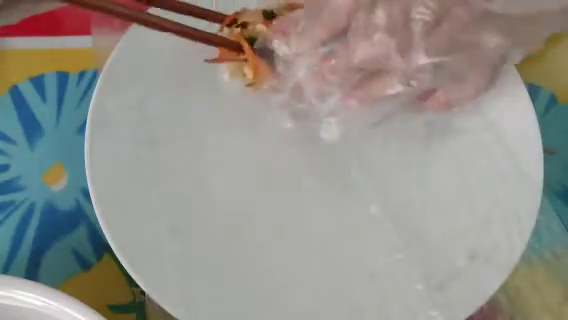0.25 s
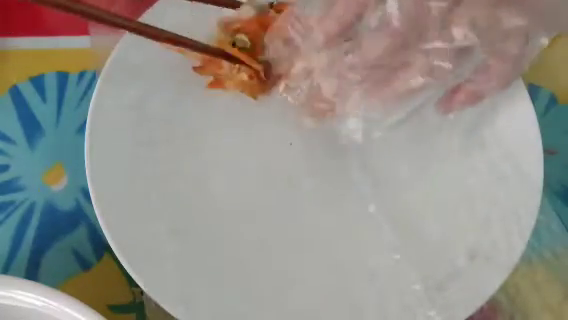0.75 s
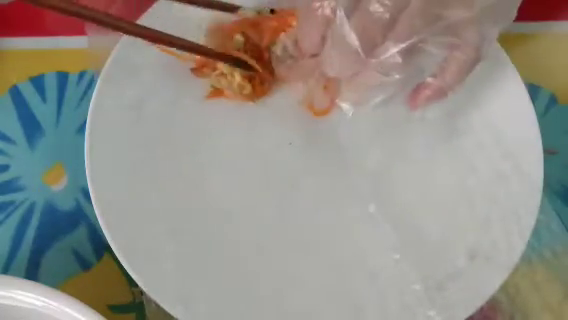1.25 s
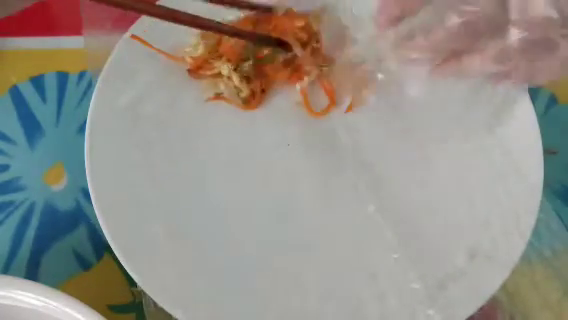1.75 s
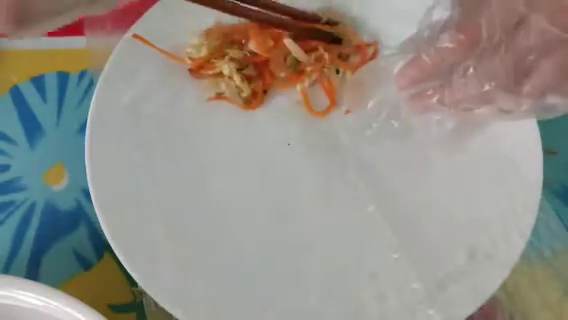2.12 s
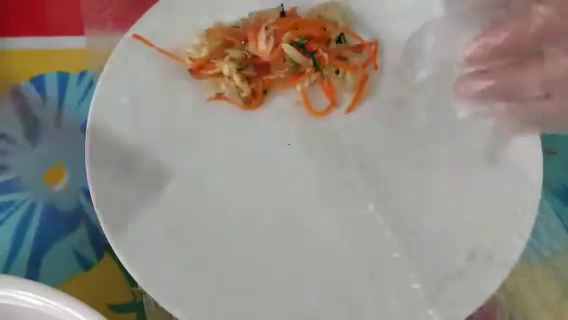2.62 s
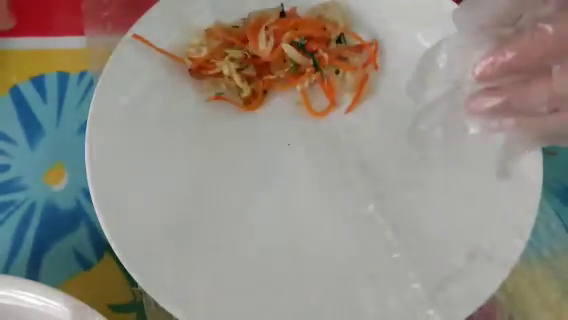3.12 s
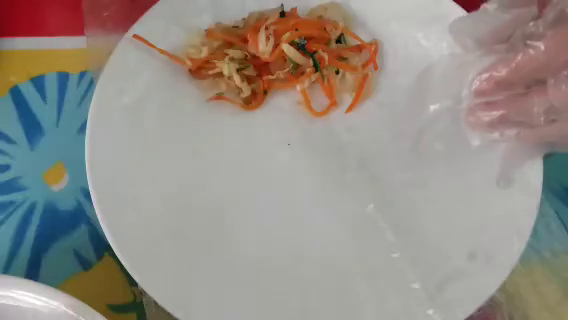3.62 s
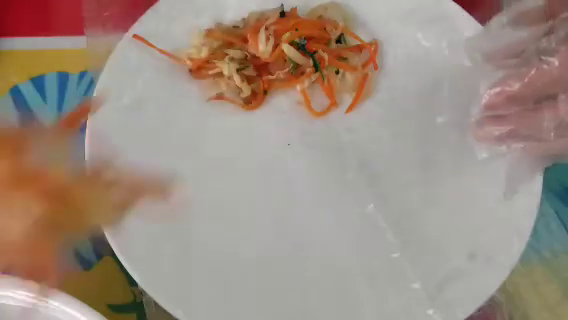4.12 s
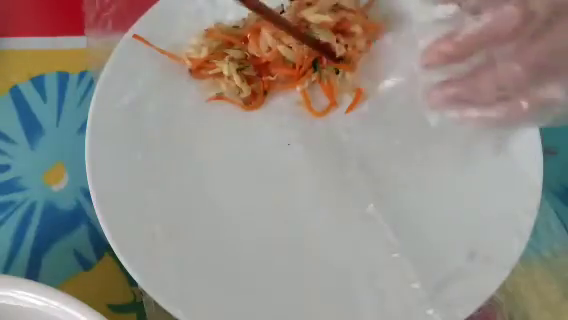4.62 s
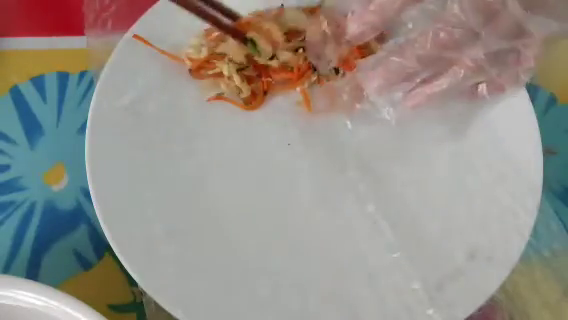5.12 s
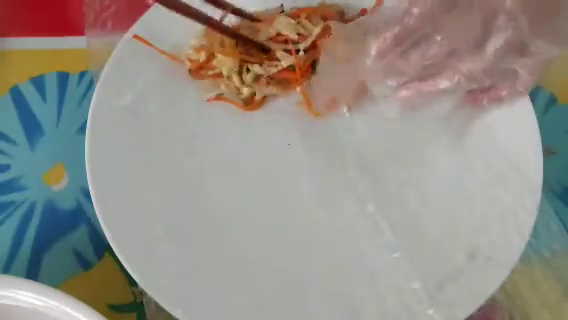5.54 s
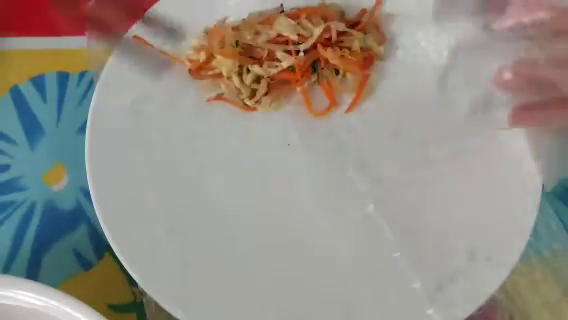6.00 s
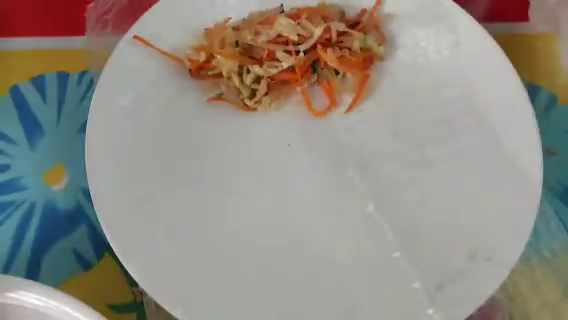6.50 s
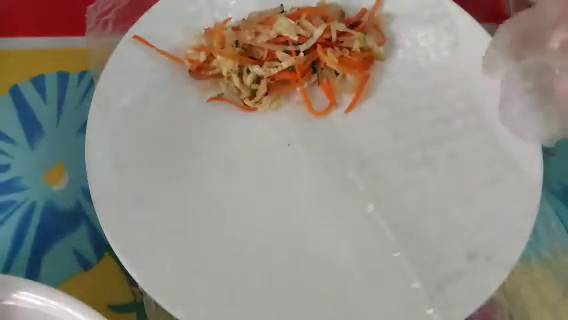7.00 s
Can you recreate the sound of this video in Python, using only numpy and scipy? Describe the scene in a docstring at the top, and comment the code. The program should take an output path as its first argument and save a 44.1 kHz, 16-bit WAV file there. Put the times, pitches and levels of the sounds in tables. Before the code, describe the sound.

Very close, a thin plastic glove crackles in busy, uneven strokes, with duller rubbing on moist shredded food and single sharp ticks from stiff creases. Chopsticks scrape faintly through the food. The rustling thins to near quiet around four seconds, then returns stronger. Near the end sticks clink loudly on a china bowl in two pairs. A low motor hum wavers behind in a small, lightly echoing kitchen.

```python
"""A hand in a thin plastic glove spreads shredded vegetables on a wrapper, close by, in a small kitchen.
The film buckles in avalanches of tiny ringing snaps and rubs on the food; stiffer creases tick singly.
Chopsticks drag through the food by many small slips, and knock a china bowl: one faint knock midway,
two double clinks near the end, each a noise crack and clatter with decaying modes of bowl and sticks.
Behind, a motor hums in wavering low tones over rumbling noise; diffuse echoes follow hands and bowl."""
import sys
import numpy as np
from scipy import signal
from scipy.fft import rfft, irfft, next_fast_len
from scipy.io import wavfile
from scipy.ndimage import uniform_filter1d

SR = 44100
rng = np.random.default_rng(int(sys.argv[2]) if len(sys.argv) > 2 else 0)


def wav_record(signal):
    """Record a signal, one row per channel, as 16-bit PCM in the file named by sys.argv[1]."""
    frames = np.transpose(np.atleast_2d(signal))
    bounded = np.clip(frames, -1, 1)
    # unit amplitude maps onto the largest positive 16-bit level
    quanta = np.round(bounded * 32767).astype(np.int16)
    wavfile.write(sys.argv[1], SR, quanta)


N = 320120
T = np.arange(N) / SR

# path of the hand, further left when it lifts off the food: (time [s], left over right [dB])
HAND_PAN = [(0.0, 0.5), (2.6, 0.7), (3.03, 7), (3.6, 5), (4.5, 0), (5.95, 0), (6.4, 5), (7.1, 3.5),
            (7.26, -1)]
# every movement slackens a little as it goes on and dies away once it stops
SAG_DB_PER_S, RELEASE_DB_PER_S = 5.0, 95.0
# the glove never lies quite still: floor of the crackle, and lone ticks set above the crackle on average
RESTING_DB, TICKS_PER_S, TICK_ABOVE_DB = -77.0, 12.0, 7.5
ROOM_T60_S = 0.47
CUTOFF_HZ = 16100


def from_db(db):
    """Amplitude gain is ten to the power of decibels over twenty."""
    return 10 ** (np.asarray(db) / 20)


def rms_one(x):
    """Normalisation to unit mean power."""
    return x / np.sqrt(np.mean(x ** 2) + 1e-20)


def in_time(rows):
    """Linear interpolation of a curve at every sample."""
    return np.interp(T, *np.transpose(rows))


def panned(db):
    """Level difference between the ears at constant total power; positive is left."""
    gains = from_db(np.array([[.5], [-.5]]) * db)
    return gains / np.sqrt(np.mean(gains ** 2, axis=0))


def drift(rate):
    """Band-limited random fluctuation of spread 1 that changes about rate times a second."""
    walk = uniform_filter1d(rng.standard_normal(8192), size=3)
    return np.interp(T * rate * 2, np.arange(len(walk)), rms_one(walk))


def coloured(x, spectrum):
    """Minimum-phase filtering: folding the cepstrum makes the response to a spectrum causal."""
    length = x.shape[-1]
    size = 2 * next_fast_len(length // 2 + SR // 10)
    hz, db = np.transpose(spectrum)
    bins_hz = np.arange(size // 2 + 1) * SR / size
    gain = from_db(np.interp(np.log(bins_hz + 1), np.log(hz), db))
    cepstrum = irfft(np.log(gain))
    cepstrum[1:size // 2] *= 2
    cepstrum[size // 2 + 1:] = 0
    response = np.exp(rfft(cepstrum))
    return irfft(rfft(x, size) * response)[..., :length]


def burst(t60, size):
    """Exponentially decaying noise of unit energy, independent at the two ears."""
    dying = rng.standard_normal((2, size)) * from_db(-60 * np.arange(size) / SR / t60)
    return dying / np.sqrt(np.sum(dying ** 2, axis=1, keepdims=True))


def add(out, s, sound):
    """Superposition of a short sound at time s."""
    start = round(s * SR)
    out[:, start:start + sound.shape[1]] += sound[:, :N - start]


def movements(rows):
    """Powers of movements sum; each rises, sags, then dies away. Gives the level in dB."""
    power = 1e-12
    for start, rise_s, length_s, db in rows:
        age = np.maximum(T - start, 0)
        sag_db = SAG_DB_PER_S * np.maximum(age - rise_s, 0)
        release_db = RELEASE_DB_PER_S * np.maximum(age - length_s, 0)
        rise = np.minimum(age / max(rise_s, .005), 1)
        power = power + (rise * from_db(db - sag_db - release_db)) ** 2
    return 10 * np.log10(power)


def film(per_s, spread_db, clump_db, t60, likeness, low_hz, high_hz, ring_db, count=48):
    """Avalanche process: buckles or slips set off others, each with its own pitch and brief ring."""
    # activity jumps at each upset, then dies away
    upsets = (rng.random(N) < 55 / SR) * rng.exponential(1, N)
    avalanche = signal.lfilter([1], [1, -np.exp(-1 / (.008 * SR))], upsets)
    surge = from_db(clump_db * np.minimum(avalanche, 2))
    born = rng.random(N) < per_s * surge / SR
    size = from_db(spread_db * np.minimum(rng.exponential(1, N), 4.5))
    clicks = born * np.sqrt(surge) * size * rng.choice([-1, 1], N)
    # slow changes of level are evened out
    power = uniform_filter1d(uniform_filter1d(clicks ** 2, size=2600), size=1300)
    clicks = clicks / np.sqrt(np.abs(power) + 0.0013)

    # a stock of rings, partly shared between the ears
    shared = np.clip(likeness, 0, 1)
    rings = []
    for hz in np.geomspace(low_hz, min(high_hz, .4 * SR), count):
        tick = np.sqrt(1 - shared) * burst(t60, size=384) + np.sqrt(shared) * burst(t60, size=384)[:1]
        ring = tick + from_db(ring_db) * signal.lfilter(*signal.iirpeak(hz, 3, fs=SR), tick)
        rings.append(rms_one(ring))

    # one ring, drawn at random, at every click
    at = np.flatnonzero(born)
    grains = np.array(rings)[rng.integers(0, count, len(at))] * clicks[at, None, None]
    places = (at[:, None] + np.arange(grains.shape[2])).ravel()
    return np.array([np.bincount(places, side.ravel(), N)[:N] for side in grains.swapaxes(0, 1)])


def glove(crackle_db, rub_db, busy=.35, flutter_db=1.1):
    """Buckling of the free film crackles brightly; friction under the fingers rubs more dully."""
    # spectra: (frequency [Hz], relative density [dB per Hz])
    crackle_colour = [(300, -23), (1000, -6), (2500, -2), (4500, -1), (6800, -1), (8100, 3), (9300, -1.5),
                      (11000, 3), (12300, 4), (14000, 2), (15800, 0), (17000, -60)]
    rub_colour = [(150, -5), (450, 6), (750, 3.5), (1050, 0), (1450, 0), (2000, 1.5), (2500, 3),
                  (3500, -1.5), (6000, -7), (16000, -55)]
    # louder movement also makes the events denser
    effort = from_db(busy * (crackle_db + 42))
    crackle = film(1800 * effort, spread_db=3.0, clump_db=3.0, t60=0.0097, likeness=0.021,
                   low_hz=2630, high_hz=16300, ring_db=0.5)
    rub = film(1100 * effort, spread_db=3.0, clump_db=4.0, t60=0.013, likeness=0.28,
               low_hz=780, high_hz=3550, ring_db=-3.0)
    crackle = rms_one(coloured(crackle, crackle_colour)) * from_db(crackle_db - 0.02)
    rub = rms_one(coloured(rub, rub_colour)) * from_db(rub_db + 1.0)
    both = crackle * panned(in_time(HAND_PAN)) + rub * panned(1.0)
    # the film sticks and slips, so both sounds flutter together
    return both * from_db(flutter_db * drift(45))


def snaps(crackle_db, spread_db=5.0, ring_db=0.5, low_hz=3000, high_hz=13000):
    """Snap-through instability: a stiff crease flips with a sharp pitched tick and a brief shiver."""
    # single creases: (time [s], relative level [dB], pitch [Hz], left over right [dB])
    creases = [(0.0258, -25.5, 12600, 1), (0.102, -22.5, 4500, 1), (0.2768, -22.5, 6000, 4),
               (0.3422, -19.5, 6000, 3), (0.4918, -19, 9000, 6), (0.6983, -25, 8996, 4),
               (0.774, -18, 7000, 6), (1.3223, -26, 12000, 1.5), (1.6501, -45, 9020, -5),
               (1.7704, -25.5, 3996, 2), (1.8204, -27, 11960, 4), (2.2528, -29.5, 7010, 15),
               (2.2897, -21.5, 6000, 9), (2.4867, -23, 8995, 2), (3.0541, -25, 12990, 17),
               (3.09, -20.5, 13000, 14), (3.223, -21, 5010, 3), (3.263, -29, 6980, 10),
               (3.3922, -34, 9020, 11), (3.468, -32, 13010, 7.5), (3.5518, -31, 9020, 3),
               (3.5872, -34, 7010, 9), (3.6745, -33, 5010, 11), (4.0136, -37, 6000, 8),
               (4.0752, -31.5, 8990, -1), (4.528, -34, 7500, -1), (4.6813, -31, 8000, 11),
               (4.8214, -29.5, 8008, 5), (5.165, -26, 4000, 5), (6.3775, -26, 6000, 11),
               (6.4725, -21, 11520, 17), (6.698, -15.5, 12010, 7), (6.9362, -28, 8000, 10)]
    # spectrum: (frequency [Hz], gain [dB])
    snap_colour = [(300, -16), (1200, -1), (3000, 1), (8000, 7), (12000, 9.5), (16000, 4)]
    # smaller creases flip at random, with a level that follows the crackle
    at = np.flatnonzero(rng.random(N) < TICKS_PER_S / SR)
    tick_db = crackle_db[at] + TICK_ABOVE_DB + spread_db * rng.standard_normal(len(at))
    tick_hz = low_hz * (high_hz / low_hz) ** rng.random(len(at))
    small = np.transpose([T[at], tick_db, tick_hz, in_time(HAND_PAN)[at]])

    out = np.zeros((2, N))
    for s, db, hz, pan_db in [*creases, *small]:
        shiver = from_db(-7) * burst(t60=0.024, size=640)
        tick = burst(t60=.005, size=640) + shiver
        resonance = signal.iirpeak(min(hz, .4 * SR), 4, fs=SR)
        tick = tick + from_db(ring_db) * signal.lfilter(*resonance, tick)
        add(out, min(s + .0008, T[-1]), from_db(db + 1.0) * panned(pan_db) * tick)
    return coloured(out, snap_colour)


def chopsticks():
    """Stick-slip excitation: many small slips of the tips keep the sticks' bending note sounding."""
    # drags through the food: (start [s], rise [s], length [s], relative level [dB])
    drags = [(0.11, 0.04, 0.04, -47), (0.26, 0.059, 0.42, -47), (0.83, 0.036, 0.15, -55),
             (0.94, 0.11, 0.27, -44.5), (1.33, 0.13, 0.2, -45), (1.9, 0.089, 0.18, -50),
             (2.19, 0.019, 0.64, -60.5), (4.82, 0.096, 0.21, -49.5), (5.24, 0.11, 0.24, -47),
             (5.61, 0.05, 0.23, -54), (5.85, 0.031, 0.043, -43)]
    # spectrum: (frequency [Hz], relative density [dB per Hz])
    drag_colour = [(200, -28), (800, -43.5), (1050, -3.5), (1300, -5), (1520, -2.5), (1720, -9.5),
                   (2100, -8), (4000, -40), (16000, -63)]
    slips = film(500, spread_db=3.5, clump_db=3.0, t60=0.0052, likeness=0.62,
                 low_hz=1220, high_hz=1880, ring_db=7)
    return rms_one(coloured(slips, drag_colour)) * from_db(movements(drags) - 5.0) * panned(0.93)


def clinks(left_lead_rad=1.59, rise_s=0.0013, crack_db=12, clatter_db=21):
    """Modal excitation by impact: a crack and short clatter, while modes of bowl and sticks decay."""
    # knocks; the spot struck favours some modes:
    # (time [s], relative level [dB], then the extra gain [dB] at each of spot_hz)
    knocks = [(3.625, -47.5, -5, 6, -1, -11, -14, -18), (6.5574, -9.5, -12, 0.5, 0, -3, -4, 2),
              (6.6313, -12, -9.5, 7, 2, -0.5, -5, -0.5), (6.646, -29.5, -4, 11, 9, -14, 13, 5),
              (6.9455, -16.5, 5.5, 8, 1, -3, 6, -3), (6.9999, -12, 0, 3.5, -6, 1, 4, -3.5)]
    # where the extra gains apply: (frequency [Hz])
    spot_hz = [900, 1550, 2374, 3397, 4600, 6500]
    # modes of the china bowl: (frequency [Hz], relative level [dB], T60 [s], left over right [dB])
    bowl_modes = [(2369, -10.5, 0.18, 1.5), (3398, 3, 0.07, -0.5), (4592, -6.5, 0.074, 3.5),
                  (5956, -11.5, 0.09, 3), (6949, -14.5, 0.05, 11), (7472, -13.5, 0.062, 13),
                  (10850, -14.5, 0.06, 15)]
    # close modes of the sticks, a clack that dies at once: same columns
    # (frequency [Hz], relative level [dB], T60 [s], left over right [dB])
    wood_modes = [(1520, -2.5, .028, -1), (1690, -8, .024, 0), (1812, -16, .02, 0), (2082, -15, .02, 3),
                  (2480, -5.5, .022, 1), (3720, -15, .022, -2)]
    # clatter of stick on china: (frequency [Hz], relative density [dB per Hz])
    clatter_colour = [(120, -13), (280, -1), (500, -14.5), (780, 5.5), (1030, 2.5), (1220, -11), (1550, -8),
                      (2100, 3), (2900, -4.5), (3600, 2.5), (5200, -10), (7000, -6), (9500, -17.5),
                      (11200, -3), (16000, -16)]
    out, t = np.zeros((2, N)), T[:SR // 4]
    for s, db, *spot_db in knocks:
        for hz, mode_db, t60, pan_db in [*bowl_modes, *wood_modes]:
            gain_db = db + mode_db + np.interp(hz, spot_hz, spot_db)
            # the ring reaches the two ears out of step
            phase = 2 * np.pi * (hz * t + rng.random()) + left_lead_rad * np.array([[1], [0]])
            envelope = from_db(gain_db - 60 * t / t60) * (1 - np.exp(-t / rise_s))
            add(out, s, envelope * np.sin(phase) * panned(pan_db))
        crack = from_db(crack_db) * burst(t60=0.0035, size=4096)
        clatter = from_db(clatter_db) * coloured(burst(t60=0.087, size=4096), clatter_colour)
        impact = coloured(crack + clatter, list(zip(spot_hz, spot_db)))
        add(out, s, from_db(db) * impact * panned(2.5))
    return out


def kitchen(x):
    """Diffuse reverberation: hard walls return a decaying tail, its treble partly absorbed."""
    # the tail begins 5 ms late
    tail = np.pad(burst(ROOM_T60_S, size=24000), ((0, 0), (SR // 200, 0)))
    echo = signal.fftconvolve(x, tail, axes=1)[:, :N]
    return coloured(echo, [(300, 9.5), (1500, 0.5), (3400, 0.0), (7000, -2), (15000, -9)])


def air(spectrum):
    """Interaural coherence of steady noise: alike at both ears in the bass, wide in the treble."""
    # (frequency [Hz], side against mid [dB])
    air_width = [(60, -18.5), (130, -13.5), (280, -9.5), (600, -5.5), (1500, 4.5)]
    mid, side = rng.standard_normal((2, N))
    stereo = mid + coloured(side, air_width) * [[1], [-1]]
    return rms_one(coloured(stereo, spectrum))


def motor(waver_rad=0.59, waver_db=2.5):
    """Phase and amplitude modulation: low tones waver at random over a rumble of air and a deep thrum."""
    # tones: (frequency [Hz], relative level [dB])
    hum_tones = [(47, -22.5), (93.7, -0.5), (100, -9.5), (140.5, -14.5), (176, -20.5), (231, -29),
                 (328, -24)]
    # spectra of moving air and deep thrum: (frequency [Hz], relative density [dB per Hz])
    rumble_colour = [(30, -27), (70, 0), (110, 3), (145, 2.5), (210, -5.5), (290, -5.5), (380, -15),
                     (460, -15.5), (560, -25), (900, -29.5), (2000, -38), (6000, -44.5), (16000, -69)]
    thrum_colour = [(15, -32), (28, -44), (44, 15), (60, 5), (75, 8), (100, -6), (200, -56), (1000, -74)]
    # courses of level: (time [s], relative level [dB])
    hum_level = [(0.0, -40), (0.08, -53), (0.55, -36), (0.74, -53), (0.89, -36), (1.03, -46), (2.3, -42.5),
                 (2.65, -50), (3.2, -42), (3.75, -47.5), (4.06, -38), (4.33, -47), (4.48, -39),
                 (4.9, -44.5), (5.5, -42), (6.1, -45.5), (6.8, -43.5), (7.26, -47.5)]
    rumble_level = [(0.0, -46.5), (0.9, -45.5), (2.2, -45), (3.8, -48.5), (4.0, -50), (4.25, -48.5),
                    (5.7, -49), (6.6, -46.5), (7.26, -52.5)]
    thrum_level = [(0.0, -57), (0.4, -47), (0.8, -47.5), (1.0, -53), (1.7, -52.5), (2.0, -58), (3.4, -59),
                   (3.8, -50.5), (4.6, -66), (5.7, -66), (5.95, -53.5), (7.26, -54)]
    hum = np.zeros(N)
    for hz, db in hum_tones:
        phase = 2 * np.pi * (hz * T + rng.random()) + waver_rad * drift(7)
        hum += from_db(db) * np.sqrt(2) * np.sin(phase)
    hum = hum * from_db(in_time(hum_level) + waver_db * drift(16))
    rumble = air(rumble_colour) * from_db(in_time(rumble_level))
    thrum = air(thrum_colour) * from_db(in_time(thrum_level) + 2)
    return (hum + rumble + thrum) * panned(0.93)


def scene():
    """Superposition of glove, chopsticks and bowl, their echoes in the room, and the motor behind."""
    # strokes of the gloved hand: (start [s], rise [s], length [s],
    # relative level of the film's crackle [dB], relative level of the rubbing on the food [dB])
    strokes = [(0.0, 0.0078, 0.052, -49.5, -54.5), (0.09, 0.036, 0.096, -37.5, -48.5),
               (0.22, 0.099, 0.2, -38.5, -47.5), (0.446, 0.04, 0.2, -40, -50),
               (0.74, 0.1, 0.16, -37.5, -48), (1.0, 0.059, 0.26, -38.5, -49),
               (1.368, 0.035, 0.12, -42.5, -53.5), (1.49, 0.058, 0.069, -35.5, -48.5),
               (1.78, 0.04, 0.1, -48.5, -55.5), (1.87, 0.088, 0.19, -39, -48), (2.12, 0.01, 0.24, -49, -57),
               (2.378, 0.078, 0.24, -46, -58.5), (2.66, 0.02, 0.08, -46.5, -58),
               (2.8, 0.03, 0.06, -50, -60.5), (2.98, 0.12, 0.22, -41.5, -52.5),
               (3.25, 0.02, 0.061, -47.5, -65), (3.53, 0.01, 0.21, -60.5, -67.5),
               (4.002, 0.0091, 0.14, -66.5, -81), (4.169, 0.031, 0.087, -60, -86),
               (4.329, 0.05, 0.13, -57.5, -70.5), (4.52, 0.087, 0.17, -49.5, -61.5),
               (4.77, 0.05, 0.15, -47.5, -59), (4.87, 0.14, 0.14, -37.5, -47.5),
               (5.08, 0.032, 0.043, -50.5, -63), (5.265, 0.08, 0.12, -36.5, -50),
               (5.42, 0.063, 0.38, -41, -52.5), (5.855, 0.03, 0.055, -31, -45),
               (6.02, 0.031, 0.17, -41, -57), (6.26, 0.12, 0.22, -41.5, -56),
               (6.598, 0.08, 0.1, -35, -46.5), (6.77, 0.04, 0.3, -41.5, -55.5),
               (7.14, 0.02, 0.11, -46, -56.5)]
    crackle_db = movements([(s, rise, length, db) for s, rise, length, db, _ in strokes])
    crackle_db = np.maximum(crackle_db, RESTING_DB)
    rub_db = movements([(s, rise, length, db) for s, rise, length, _, db in strokes])
    hands = glove(crackle_db, rub_db) + snaps(crackle_db) + chopsticks()
    bowl = clinks()
    echo = kitchen(from_db(-10) * hands + from_db(-12) * bowl)
    return hands + bowl + echo + motor()


def record(dry):
    """Band limiting: a steep elliptic low-pass cuts the top."""
    low_pass = signal.ellip(12, .2, 80, CUTOFF_HZ, fs=SR, output="sos")
    return signal.sosfilt(low_pass, dry)


dry = scene()
out = record(dry)
wav_record(out)
```